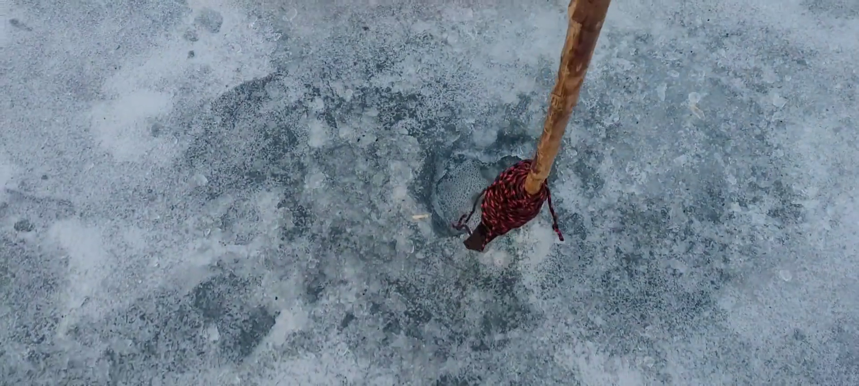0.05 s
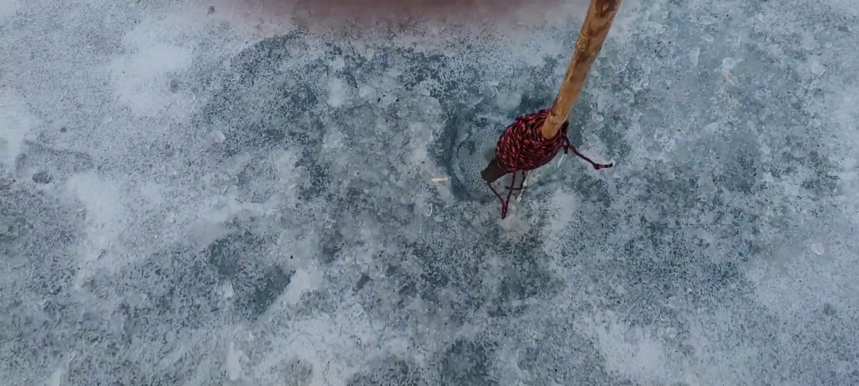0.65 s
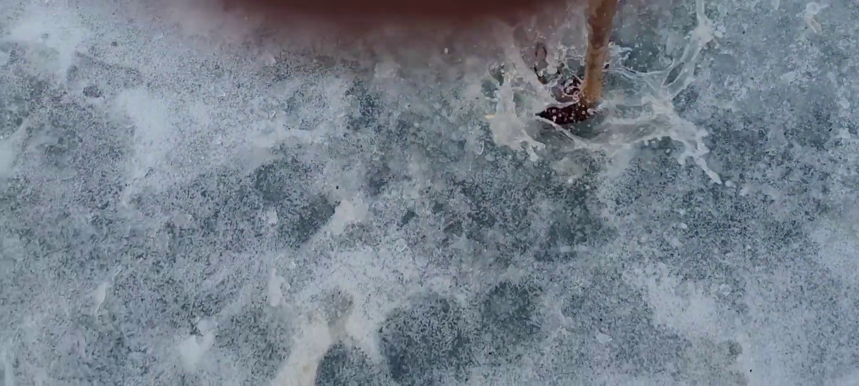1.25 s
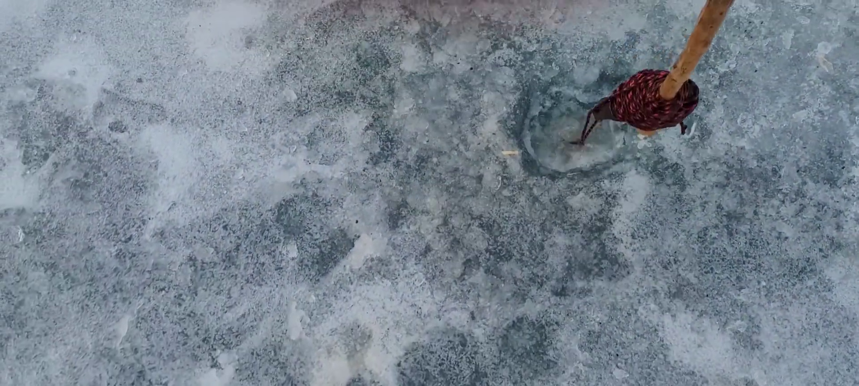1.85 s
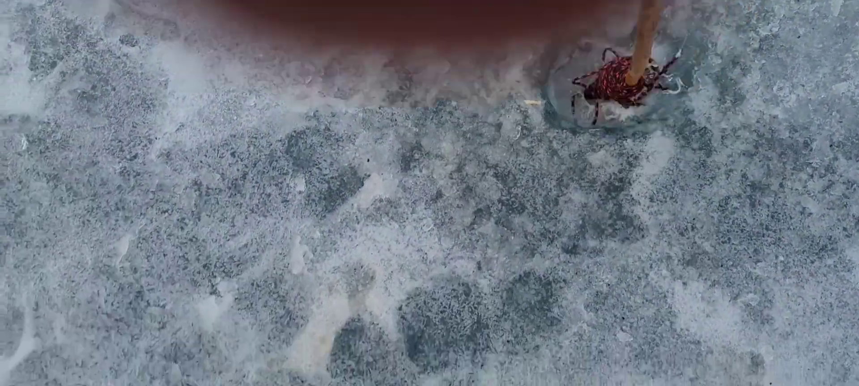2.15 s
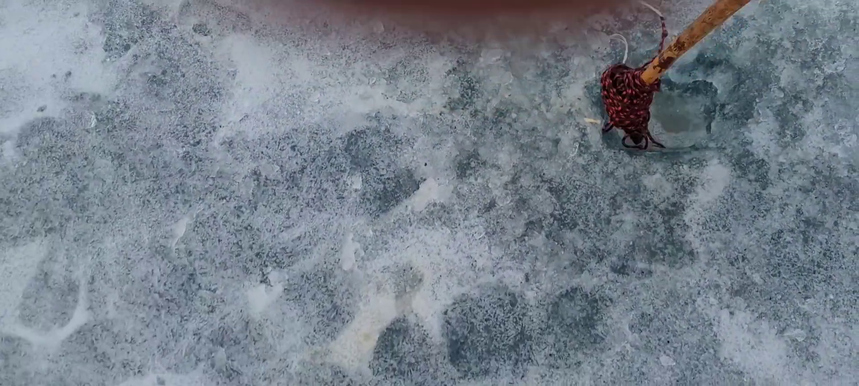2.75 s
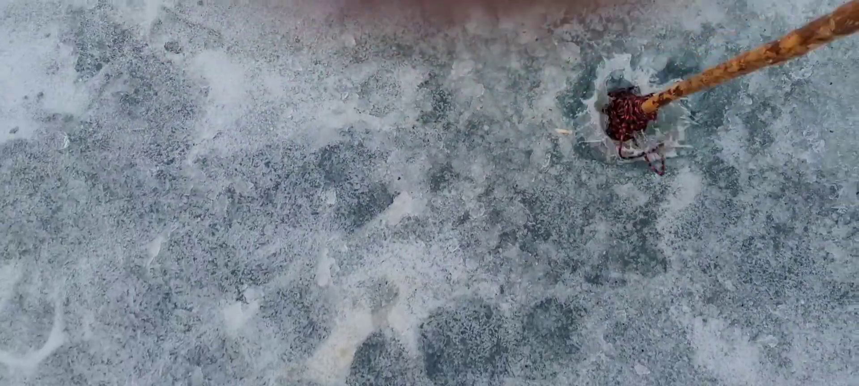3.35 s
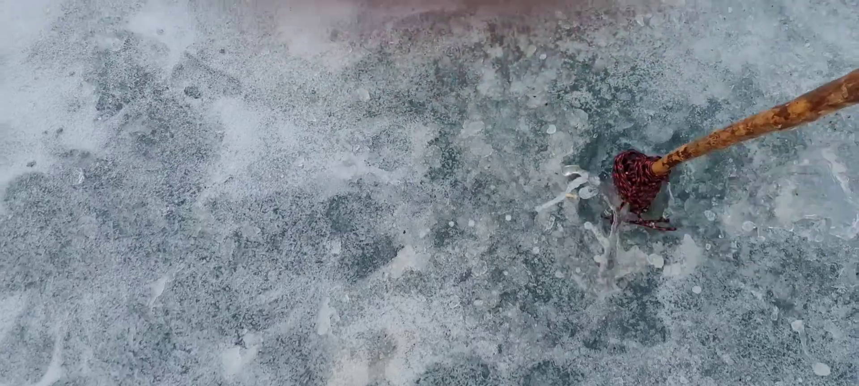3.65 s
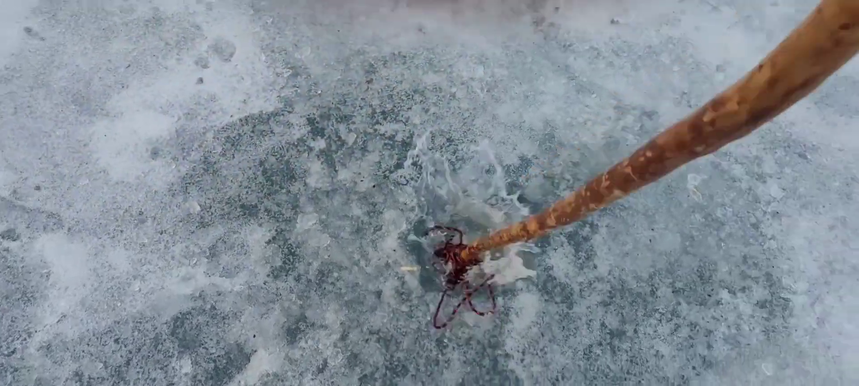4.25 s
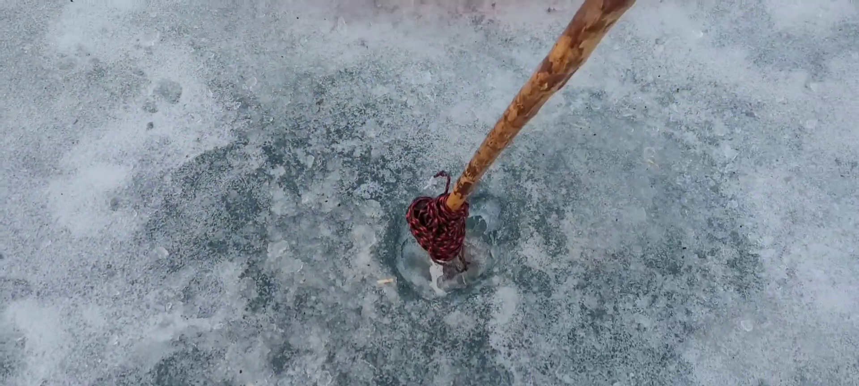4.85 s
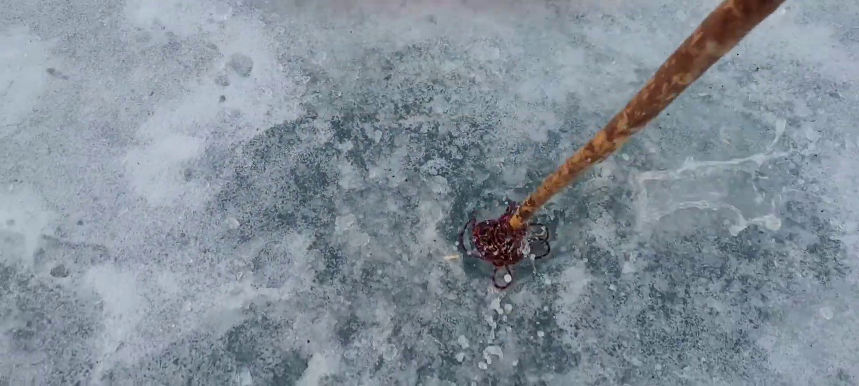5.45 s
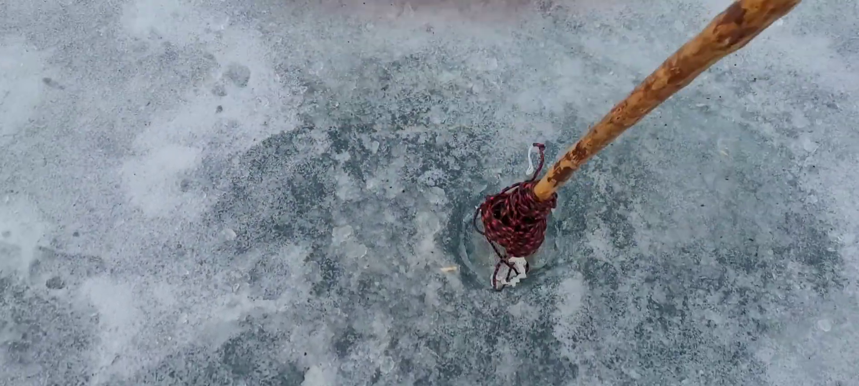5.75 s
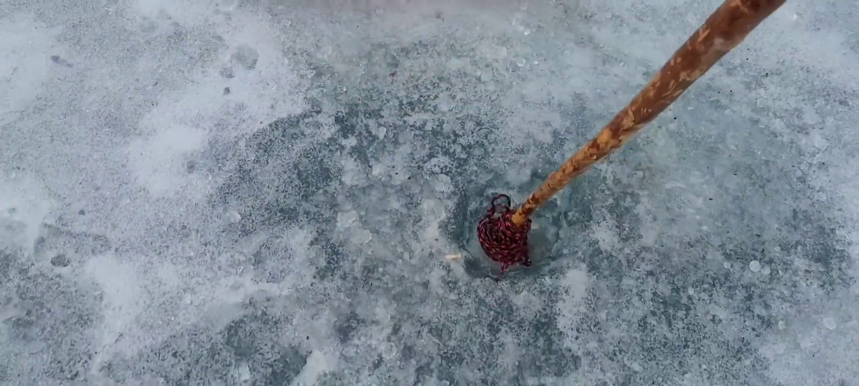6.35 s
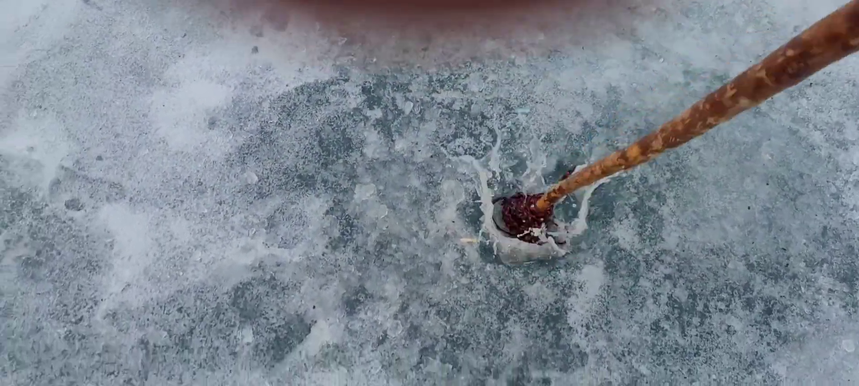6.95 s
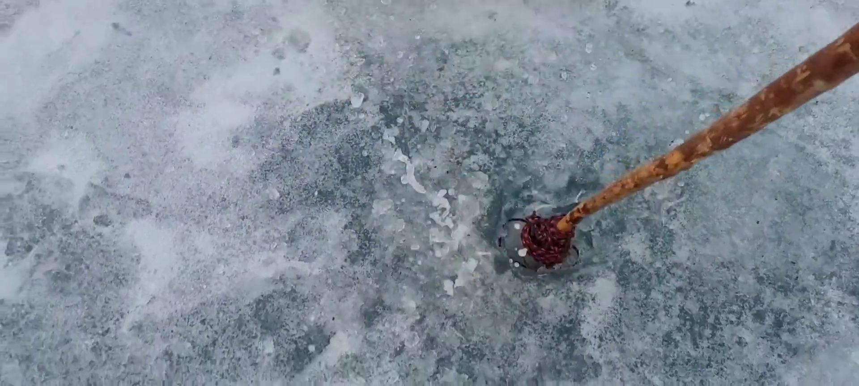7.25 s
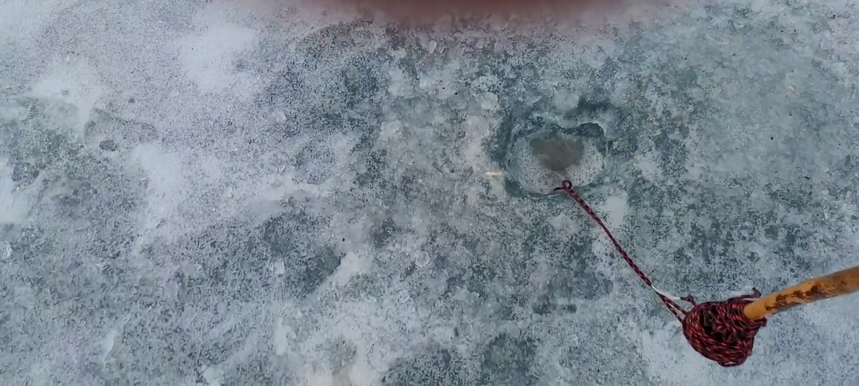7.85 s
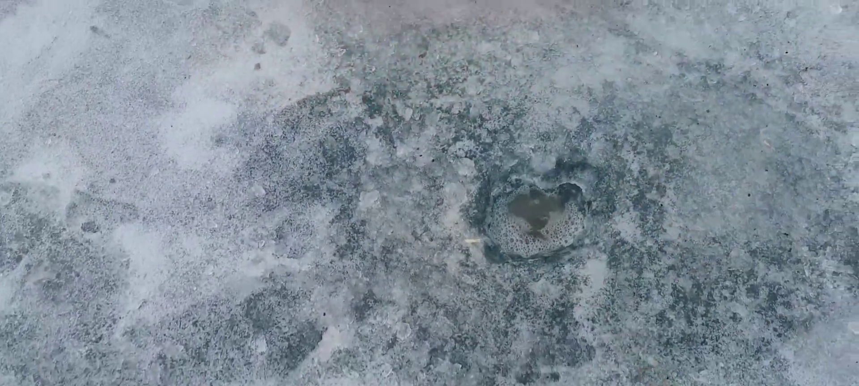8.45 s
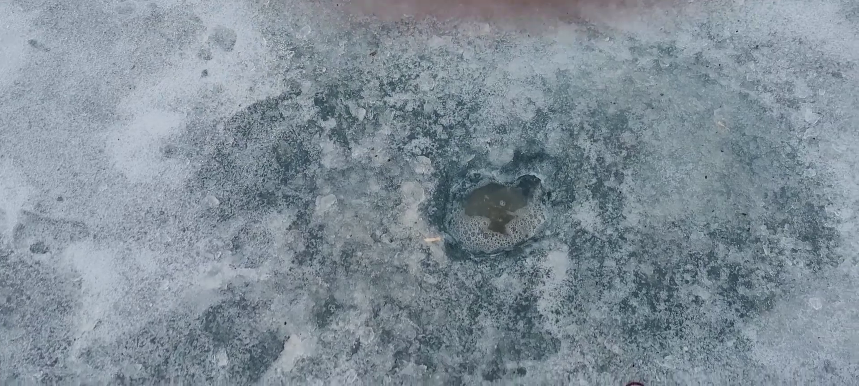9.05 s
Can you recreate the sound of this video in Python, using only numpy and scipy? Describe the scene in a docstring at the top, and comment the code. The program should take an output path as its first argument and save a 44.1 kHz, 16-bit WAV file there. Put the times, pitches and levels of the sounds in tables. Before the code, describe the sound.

A stone tied to a stick strikes a water-filled hollow in lake ice eight times, about once a second. Each blow gives a short knock, a splash with a hollow gulp and a low thump. Spray patters onto the ice while the hollow gurgles full again. Finally the stone is set down with a light knock. The air outdoors is still, with soft low puffs from the swings reaching the close microphone.

```python
"""A stone lashed to a stick chops eight times into a water-filled hollow in lake ice.
Each blow cracks on the ice, drives the water out with a gulp and bends the sheet with a low thump.
The thrown spray patters down up to half a second later, while the hollow gurgles full again.
At last the stone is set down. Behind it all is still air, with low puffs from the swinging."""
import sys
import numpy as np
from scipy import signal
from scipy.fft import rfft, irfft
from scipy.io import wavfile
from scipy.ndimage import uniform_filter1d

SR = 44100
rng = np.random.default_rng(int(sys.argv[2]) if len(sys.argv) > 2 else 0)


def persist_wave(psi):
    """Save psi, clipped to +-1, as 16-bit WAV."""
    counts = np.round(np.clip(psi, -1, 1) * 32767).astype(np.int16)
    wavfile.write(sys.argv[1], SR, np.atleast_2d(counts).T)


N = 400869
TIME = np.arange(N) / SR

# Levels are relative: each layer gets its own gain later. A fade time is the time to drop by 60 dB.
# The blows. Each row: water contact and deepest point in seconds, levels of entry, surge, mist and gulp
# in dB, gulp pitch in Hz, thump level in dB, thump pitch in Hz, air puff level in dB.
BLOWS = [(0.25, 0.26, -22.5, -29.5, -29, -29, 490.7, -25.5, 170, -34),
         (1.106, 1.13, -22, -11.5, -25, -17.5, 500, -11, 212, -33.5),
         (2.119, 2.143, -28, -17.5, -31.5, -21.5, 440, -29.5, 167, -35),
         (3.332, 3.356, -28.5, -11.5, -29.5, -18, 375, -19.5, 190, -34),
         (4.201, 4.242, -23, -9.5, -28, -16.5, 393, -23.5, 194, -28.5),
         (5.101, 5.126, -21.5, -13.5, -24, -24.5, 453, -25, 176, -31.5),
         (5.886, 5.923, -25, -11.5, -24, -13.5, 370, -18, 228, -29.5),
         (6.905, 6.92, -28, -9.5, -24.5, -20, 472, -22.5, 160, -28)]
# Stone meets ice. Each row: time in seconds, level in dB, fade time in seconds, treble in dB, pitch in Hz.
CRACKS = [(0.2522, -4, 0.017, -11.5, 1406), (0.255, -22.5, .015, -8, 1900),
          (0.2579, -13, .015, -12.5, 1594), (1.1095, -21, .012, -2.5, 2200), (1.1308, -5, .012, -11, 1448),
          (2.127, -31.5, .015, 20.5, 1850), (3.335, -31, .012, -5, 1880), (3.3561, -9, 0.039, -7, 1110),
          (4.2041, -17, .015, -2.5, 2000), (4.207, -10.5, 0.066, -4.5, 1723), (5.103, -9, .025, -10, 1400),
          (5.1092, -5, .02, -15.5, 1280), (5.115, -6, .018, -16.5, 1200), (5.8808, -3.5, .014, -17.5, 2410),
          (5.8899, -4, .018, -39.5, 1379), (6.9075, -23.5, .012, -9.5, 2800), (6.9165, -4, .02, -15, 1400),
          (8.2388, -17, .025, -10, 1674), (8.266, -25.5, .025, -9, 2250)]
# Water thrown by each blow: some runs straight back (backwash), some rains down (shower).
# Each row: backwash slosh and splatter in dB, its fade time in seconds, shower splatter and fine spray
# in dB, flight time and its spread in seconds.
THROWS = [(-65, -55, 0.18, -72.5, -65, 0.19, 0.046), (-51.5, -60.5, 0.87, -38.5, -41.5, 0.43, 0.1),
          (-34, -44.5, .8, -45.5, -52, 0.34, 0.096), (-45, -54.5, 1.2, -36, -43, 0.35, 0.067),
          (-41.5, -40, 0.99, -44, -46.5, 0.36, 0.099), (-35.5, -35, 0.57, -41.5, -48.5, 0.37, 0.11),
          (-53, -49.5, 1.9, -44.5, -48, 0.36, 0.11), (-44, -62, 0.7, -45.5, -49.5, 0.36, 0.12)]
# The moving stone stirs the water. Each row: time and half length in seconds, then splatter,
# fine spray and slosh in dB.
STIRS = [(0.039, 0.012, -71, -64, -81.5), (0.209, 0.021, -63, -63.5, -67), (.325, 0.034, -55, -59.5, -62),
         (1.086, .006, -54, -59.5, -60), (2.752, 0.041, -50.5, -75, -54), (3.06, 0.052, -55, -76, -52),
         (3.14, 0.034, -50.5, -61.5, -48), (3.24, 0.067, -62, -82, -55), (4.06, 0.032, -56.5, -58.5, -50),
         (4.815, 0.015, -50, -57.5, -51.5), (4.96, 0.084, -56.5, -71.5, -65), (5.08, 0.012, -47, -53, -69),
         (5.86, 0.013, -44, -54, -48), (6.868, 0.032, -46, -52.5, -55), (8.12, 0.11, -69.5, -63.5, -77.5)]
# Big drops and ice chips landing. Each row: start in seconds, level in dB, treble in dB.
DROPS = [(0.506, -38, 2), (0.542, -52, 8), (1.271, -32.5, -18), (1.575, -26.5, -4), (1.623, -26, -9),
         (1.652, -37, 21), (1.677, -24, 11.5), (1.73, -31, 9), (1.787, -40.5, 21), (1.82, -34.5, 14.5),
         (1.872, -34.5, 15.5), (2.2014, -26, -26), (2.21, -23.5, -19), (2.268, -22.5, -14),
         (2.368, -30, -35), (2.388, -32.5, -42), (2.618, -30.5, -16), (2.746, -48, 22.5),
         (2.767, -36.5, 10), (3.098, -54.5, 14.5), (3.127, -34.5, -2), (3.492, -35.5, -3),
         (4.359, -31, -12), (4.459, -28.5, -3), (4.507, -44, 17), (4.561, -53, 24), (4.969, -40, 8.5),
         (5.423, -38, -5.5), (5.665, -36, 22), (5.849, -26.5, -8.5), (6.184, -29, -6), (6.284, -39, -9),
         (6.407, -36, 3), (6.513, -33.5, 9.5), (6.615, -34.5, 5.5), (6.858, -36, 12), (7.017, -35, 14.5),
         (7.06, -38.5, -22.5), (7.196, -31, -3), (7.387, -28, 2), (7.399, -32.5, 0), (7.472, -32.5, 10),
         (7.65, -46.5, 17), (7.762, -59, 24.5), (7.839, -55.5, 21.5), (7.995, -63, 24), (8.309, -50, 11)]
# Big air pockets. Each row: start in seconds, pitch in Hz, level in dB, pitch rise as a share.
BUBBLES = [(1.081, 1030, -40, .03), (1.182, 1650, -28, .05), (1.186, 386, -28, .1), (1.382, 567, -30, .08),
           (2.15, 381, -5.5, .09), (2.1994, 463, -11, .08), (2.210, 600, -22.5, .08),
           (2.222, 347, -19.5, .1), (2.366, 514, -27, .16), (2.378, 272, -24.5, .07),
           (2.512, 550, -29.5, .2), (2.768, 1950, -35.5, .09), (3.046, 347, -20.5, .1),
           (3.098, 1640, -32, .08), (3.137, 1730, -23, .11), (3.194, 353, -34.5, .05),
           (3.251, 450, -35, .11), (3.285, 575, -32, .11), (3.574, 1680, -35.5, .08),
           (3.598, 1420, -29.5, .08), (4.036, 1530, -29, 2.7), (4.056, 322, -30.5, .04),
           (4.077, 1770, -39, .5), (4.294, 2100, -27, .8), (4.359, 620, -34.5, .09),
           (4.461, 1010, -31.5, .15), (4.808, 1760, -26.5, .26), (5.143, 358, -12, .07),
           (5.166, 436, -17, .08), (5.186, 342, -18, .15), (5.294, 271, -27, .06), (5.474, 406, -26.5, .07),
           (6.476, 644, -32.5, .23), (7.002, 415, -32, .1), (7.058, 400, -20, .19), (7.52, 1040, -43, 0.15)]
# Puffs of air besides those of the blows. Each row: time in seconds, level in dB, half length in seconds.
PUFFS = [(0.813, -52, 0.038), (1.509, -57, 0.033), (2.972, -56.5, .06), (3.08, -41, 0.065),
         (3.914, -54.5, 0.056), (4.645, -48.5, .058), (6.178, -49, .039), (8.47, -64, 0.041)]

# Tone colours. Each row: frequency in Hz, level in dB.
AIR_TONE = [(20, -5), (50, 0), (100, -11), (200, -17), (420, -12), (800, -20), (1200, -26), (1900, -16),
            (2800, -19), (5000, -17), (9000, -17), (16000, -20)]  # still air
PUFF_TONE = [(10, -29), (30, -11), (52, -0.5), (75, -6), (110, -17), (200, -44), (600, -82)]  # pushed air
SLOSH_TONE = [(50, -29.5), (170, -21.5), (260, -1.5), (430, 1), (650, -1.5), (900, -4), (1800, -28),
              (5000, -60.5)]  # water rocking in the hollow
BACKWASH_TONE = [(200, -23.5), (500, -9), (900, -7.5), (1400, 0.5), (1950, 0.5), (2800, -6.5),
                 (4300, -11.5), (6000, -23.5), (9000, -31.5), (16000, -36)]  # water running back in
SPLAT_TONE = [(200, -33), (500, -14.5), (900, -10.5), (1400, 0), (1950, 3.5), (2800, -2.5), (4300, -8.5),
              (6000, -10), (9000, -23.5), (16000, -21.5)]  # drops slapping the ice
FIZZ_TONE = [(1500, -23.5), (4000, 1), (6000, -7.5), (7300, -2), (8700, -7.5), (10500, -1.5), (13000, -2.5),
             (15500, -1)]  # fine spray and crunching ice
SURGE_TONE = [(150, -18.5), (500, -5.5), (850, -7), (1300, 2), (2000, 2), (3000, -6), (4500, -10.5),
              (6000, -16.5), (9000, -28.5), (16000, -28)]  # the jet of water
CRACK_TONE = [(100, -15), (400, -16.5), (850, -18.5), (1250, -0.5), (1550, 2), (2000, -0.5), (2700, -4.5),
              (3600, -8), (5200, -13), (8000, -23.5), (16000, -35.5)]  # stone knocking on ice

# How alike the two sides of the microphone sound. Each row: frequency in Hz, likeness from 0 to 1.
LIKENESS = [(290, 1), (640, 1), (1400, 1), (3100, .1), (6000, 0.021)]
# Which side is louder. Each row: frequency in Hz, left minus right in dB.
LEAN = [(60, -12.5), (200, -1), (400, -3), (700, -2.5), (1300, 8), (2400, 10), (4400, 4), (8000, 0.5),
        (15000, 5.5)]


def amp(db):
    """Turns decibels into a gain."""
    return 10 ** (np.asarray(db) / 20)


def evened(x):
    """Scales a signal to an average power of 1."""
    return x / np.sqrt(np.mean(x ** 2) + 1e-20)


def read(points, hz):
    """Looks up a table between its rows, on a logarithmic frequency scale."""
    f, value = np.transpose(points)
    return np.interp(np.log(hz + 1), np.log(f + 1), value)


def add(mix, s, sound):
    """Mixes a sound in, starting at s seconds."""
    part = mix[..., max(round(s * SR), 0):][..., :sound.shape[-1]]
    part += sound[..., :part.shape[-1]]


def colour(x, tone, size=4096):
    """Gives a sound a tone colour, with a filter that rings only after each hit."""
    log_gain = np.log(amp(read(tone, abs(np.fft.fftfreq(size, 1 / SR)))))
    response = np.exp(np.conj(signal.hilbert(log_gain)))
    taps = np.fft.ifft(response).real[:size // 2]
    return signal.oaconvolve(x, taps[None] / np.linalg.norm(taps), axes=1)[:, :N]


def noise():
    """Left and right white noise: alike in the bass, unrelated in the treble."""
    left, other = rfft(rng.standard_normal((2, N)))
    same = np.clip(read(LIKENESS, np.fft.rfftfreq(N, 1 / SR)), -1, 1)
    right = same * left + np.sqrt(1 - same ** 2) * other
    return irfft(np.array([left, right]), N)


def wobble(size):
    """A random curve, smoothed over size samples."""
    return evened(uniform_filter1d(rng.standard_normal(N), size))


def dying(fade_s, size=6000):
    """A gain that starts at 1 and drops 60 dB every fade_s."""
    return np.exp(-np.log(1000) * np.arange(size) / SR / max(fade_s, 1e-3))


def swell(s, half_s):
    """A bell-shaped gain around s seconds."""
    return np.exp(-np.minimum(((TIME - s) / half_s) ** 2, 20))


def still_air():
    """The faint hush of the outdoors."""
    return amp(-71) * colour(noise(), AIR_TONE)


def air_puffs(delay_s=0.019, half_s=0.033, wake_db=-18, wake_half_s=0.076):
    """Each swing pushes air at the microphone; a weaker wake follows."""
    push = sum(amp(db) * swell(s, half) for s, db, half in PUFFS)
    for _, deep, *_, db in BLOWS:
        s = deep + delay_s
        push += amp(db) * swell(s, half_s)
        push += amp(db + wake_db) * swell(s + wake_half_s / 2, wake_half_s)
    return push * colour(noise()[:1], PUFF_TONE)


def ice_echo(x, fade_s=0.3, echo_db=-35):
    """Adds the faint, dull sound that bounces off the rough ice nearby."""
    dull = signal.lfilter([1], [1, -.7], rng.standard_normal((2, SR // 2)))
    tail = dull * dying(fade_s, size=SR // 2)
    return x + amp(echo_db) * signal.oaconvolve(x, tail / np.linalg.norm(tail[0]), axes=1)[:, :N]


def bubble(hz, cycles, rise):
    """A ringing air pocket whose pitch climbs as it nears the surface."""
    age = np.arange(int(SR * cycles / hz)) * hz / SR  # in cycles
    ring = np.sin(2 * np.pi * age * (1 + rise * age / cycles))
    return ring * np.exp(-np.log(1000) * age / cycles) * (1 - np.exp(-age / 0.47))


def gurgles(lowest_hz=240):
    """Air pockets ring briefly in the hollow; the churning water roughens them."""
    out = np.zeros(N)
    for s, hz, db, rise in BUBBLES:
        cycles = 10 * (hz / 450) ** .75
        add(out, s, amp(db + 4.5) * bubble(hz, cycles, rise))
    churn = 1 + .35 * wobble(70)
    return signal.sosfilt(signal.butter(3, lowest_hz, "high", fs=SR, output="sos"), out * churn)


def patter(per_s, spread_db, fade_s):
    """A flickering gain made of many random drops, each a short dying burst."""
    sizes = amp(spread_db * np.minimum(rng.exponential(1, N), 4))
    hits = sizes * (rng.random(N) < per_s / SR)
    power = signal.oaconvolve(hits ** 2, dying(fade_s) ** 2)[:N]
    return evened(np.sqrt(abs(power)))


def droplets(count, low_hz, high_hz, cycles, spread_db, size):
    """A rain of tiny rising plinks, each with its own pitch and place."""
    when, pitch, chance, side, life = rng.random((count, 5)).T[:, :, None]
    hz = low_hz * (high_hz / low_hz) ** pitch
    gain = hz * amp(-spread_db * np.log(np.maximum(chance, .03)))
    index = (when * N).astype(int) + np.arange(size)
    channels = []
    for way in (-1, 1):
        delay_s = .0004 * (.5 + way * (side - .5))  # the far side hears it later
        age = np.maximum(np.arange(size) / SR - delay_s, 0) * hz  # in cycles
        spent = age / (cycles * (.25 + 4 * life ** 3))
        ring = np.sin(2 * np.pi * age * (1 + .06 * np.minimum(spent, 1)))
        plinks = gain * ring * np.exp(-np.log(1000) * spent)
        channels.append(np.bincount(index.ravel(), plinks.ravel(), N)[:N])
    return evened(np.array(channels))


def shower(s, spread_s, slope_db=8.5):
    """The gain of falling drops that thicken towards s seconds, then thin out."""
    return amp(-slope_db * (np.hypot(1, (TIME - s) / spread_s) - 1))


def water_levels(delay_s=0.03, rise_s=0.025, straggler_fade_s=2.2, clump_db=1.5, clump_s=0.03):
    """Gains of splatter, fine spray, slosh and backwash, as the stone throws and stirs the water."""
    power, backwash = np.zeros((3, N)), np.zeros(N)  # power rows: splatter, fine spray, slosh
    for (_, deep, *_), throw in zip(BLOWS, THROWS):
        slosh_db, back_db, fade_s, shower_db, fine_db, flight, spread = throw
        age = TIME - deep - delay_s
        running = np.clip(1 + age / rise_s, 0, 1) * amp(-60 * np.clip(age / fade_s, 0, 2))
        backwash += (amp(back_db) * running) ** 2
        power[1:] += (amp([[back_db - 14.5], [slosh_db]]) * running) ** 2
        large = amp(shower_db) * shower(deep + flight, spread)
        small = amp(fine_db) * shower(deep + flight + 0.079, spread * 0.84)  # small drops fly higher
        late = TIME - deep - flight
        stragglers = (late > 0) * amp(fine_db - 12 - 60 * np.clip(late / straggler_fade_s, 0, 2))
        churn = amp(-13.5) * large
        power += np.array([large, np.hypot(small, stragglers), churn]) ** 2
    for s, half, *levels_db in STIRS:
        power += (amp(levels_db)[:, None] * swell(s, half)) ** 2
    clumps = amp(clump_db * wobble(int(clump_s * SR)))  # water comes down unevenly
    return np.sqrt([*power, backwash]) * clumps


def spray():
    """Thrown water rains back on the ice as slaps, plinks and fizz while the hollow sloshes."""
    splatter, fine, slosh, backwash = water_levels()
    landing = patter(per_s=900, spread_db=3.4, fade_s=.011)  # heard in both splat and fizz
    plinks = droplets(count=7000, low_hz=500, high_hz=5000, cycles=9, spread_db=2.8, size=400)
    splat = .78 * noise() * landing + .6 * plinks
    ticks = droplets(count=4500, low_hz=4500, high_hz=15000, cycles=12, spread_db=3.2, size=160)
    hiss = noise()
    sprinkle = patter(per_s=350, spread_db=4, fade_s=.009)
    fizz = .8 * hiss * np.hypot(.6 * landing, .8 * sprinkle) + .45 * ticks
    pockets = droplets(count=1100, low_hz=200, high_hz=1000, cycles=9, spread_db=2, size=1400)
    lapping = .55 * noise() * patter(per_s=200, spread_db=2.5, fade_s=.03) + .45 * pockets
    return (amp(-2.5) * colour(splat * splatter, SPLAT_TONE)
            + amp(-3.5) * colour(splat * backwash, BACKWASH_TONE)
            + amp(9) * colour(fizz * fine, FIZZ_TONE)
            + amp(-5) * colour(lapping * slosh, SLOSH_TONE))


def big_drops():
    """Big drops slap the ice: soft, wet ones sound low, hard chips tick high."""
    slaps, tick, grit = np.zeros((2, N)), np.zeros(N), noise()
    for s, db, treble_db in DROPS:
        shape = dying(0.017) - .6 * dying(.002)
        tone = [(f * 2 ** ((treble_db + 2) / 25), level) for f, level in SPLAT_TONE]
        burst = grit[:, int(s * SR):][:, :len(shape)] * shape
        add(slaps, s, amp(db) * colour(burst, tone))
        add(tick, s, amp(db + treble_db) * shape)
    return slaps + amp(-8.5) * colour(noise() * tick, FIZZ_TONE)


def ice_thumps(fall_s=0.026, low_hz=35, fade_s=0.068):
    """The ice sheet bends: low pitches travel slower in it, so each thump slides down."""
    out = np.zeros(N)
    t = np.arange(6000) / SR
    chops = [(deep, db, hz) for _, deep, *_, db, hz, _ in BLOWS]
    set_down = (8.239, -48, 151)  # the stone is laid on the ice
    shape = dying(fade_s) * (1 - np.exp(-t / 0.0033))
    for s, db, hz in chops + [set_down]:
        turns = np.cumsum(low_hz + (hz - low_hz) * np.exp(-t / fall_s)) / SR
        add(out, s - .002, amp(db + 6.5) * np.sin(2 * np.pi * turns) * shape)
    return out


def gulps(lead_s=0.03):
    """The gap in the water behind the stone collapses with a hollow gulp."""
    out = np.zeros(N)
    t = np.arange(SR // 4) / SR - lead_s
    rise = np.exp(np.minimum(t + .003, 0) / .005)
    fall = np.exp(-np.maximum(t - .003, 0) / .007) + amp(-24) * np.exp(-t / .04)
    for _, deep, _, _, _, db, hz, *_ in BLOWS:
        band = signal.butter(3, [hz * .55, hz * 1.417], "band", fs=SR, output="sos")
        hollow = evened(signal.sosfilt(band, rng.standard_normal(len(t))))
        add(out, deep - lead_s, amp(db) * rise * fall * hollow)
    return out


def splashes():
    """The stone squeezes out a jet of water that swells as it sinks, then tears into drops."""
    jet, mist = np.zeros(N), np.zeros(N)
    for start, deep, entry_db, surge_db, mist_db, *_ in BLOWS:
        sinking = max(deep - .013, (start + deep) / 2)
        times = [start - .004, start + .001, sinking, deep, deep + .018, deep + .06, deep + .12]
        jet_curve = [entry_db - 33.5, entry_db, entry_db + 9.5, surge_db, surge_db / 2 - 20, -44, -62]
        mist_curve = [-58, -28, -28, mist_db, mist_db - 11.5, -52, -66]
        jet += amp(np.interp(TIME, times, jet_curve, -200, -200))
        mist += amp(np.interp(TIME, times, mist_curve, -200, -200))
    tearing = patter(per_s=15000, spread_db=1.5, fade_s=0.019)
    surge = amp(-7) * colour(noise() * jet * tearing, SURGE_TONE)
    return surge + colour(noise() * mist * tearing, FIZZ_TONE)


def stone_cracks():
    """The stone lands with a hard knock, coloured by where it hits; brittle ice crunches around it."""
    knocks, crunch, grit = np.zeros((2, N)), np.zeros(N), noise()
    lead = 130  # samples in which the frosted skin crushes before the stone meets solid ice
    crush = amp(-11) * dying(.012, size=lead)[::-1]
    for s, db, fade_s, treble_db, hz in CRACKS:
        burst = amp(db) * np.r_[crush, dying(fade_s) + amp(-33) * dying(.1)]
        force = grit[:, int(s * SR):][:, :len(burst)] * burst * amp(1)
        force[:, lead] -= 4 * amp(db)  # the hard knock itself
        tone = [(f * hz / 1500, level) for f, level in CRACK_TONE]
        add(knocks, s - lead / SR, colour(force, tone))
        add(crunch, s - lead / SR, burst * amp(treble_db))
    return amp(-5.5) * knocks + amp(-2.5) * colour(noise() * crunch, FIZZ_TONE)


def scene():
    """The chopping, the water it throws and the air over the open lake."""
    chopping = stone_cracks() + gulps() + splashes() + ice_thumps()
    water = spray() + big_drops() + gurgles()
    return ice_echo(chopping + water) + air_puffs() + still_air()


def record(dry, top_hz=16100):
    """The microphone's two sides face different ways; peaks are rounded and the highest treble is cut."""
    hz = np.fft.rfftfreq(N, 1 / SR)
    sides = amp(read(LEAN, hz) * np.array([[.5], [-.5]]))
    leaning = irfft(rfft(dry) * sides / np.sqrt(np.mean(sides ** 2, axis=0)), N)
    treble_cut = signal.firwin(401, top_hz, window=("kaiser", 8), fs=SR)
    return signal.oaconvolve(np.tanh(leaning), treble_cut[None], "same")


dry = scene()
out = record(dry)
persist_wave(out)
```